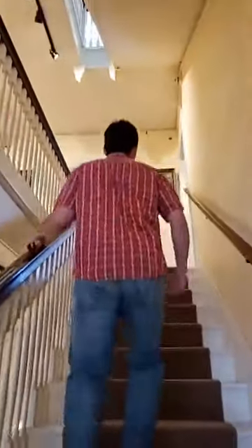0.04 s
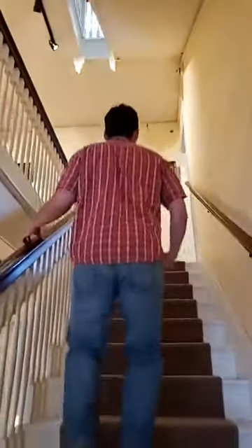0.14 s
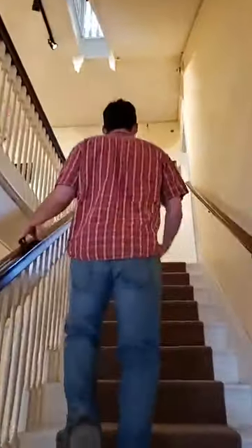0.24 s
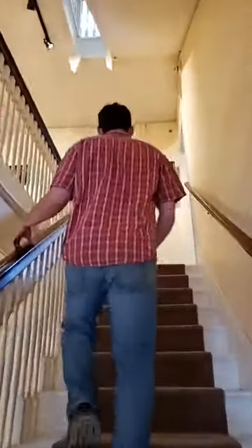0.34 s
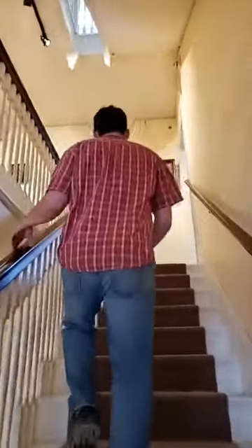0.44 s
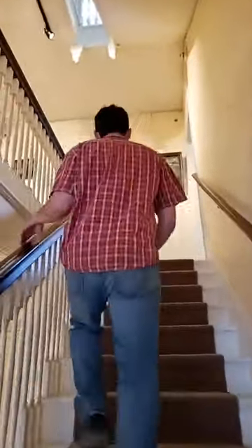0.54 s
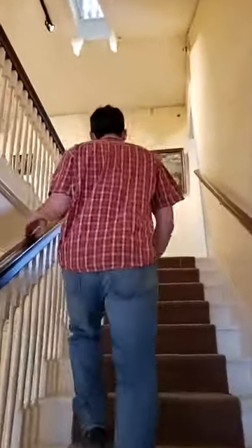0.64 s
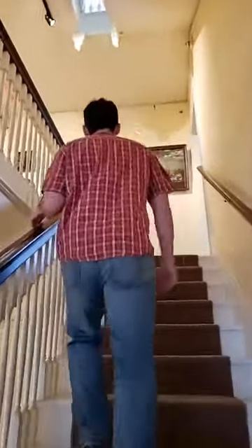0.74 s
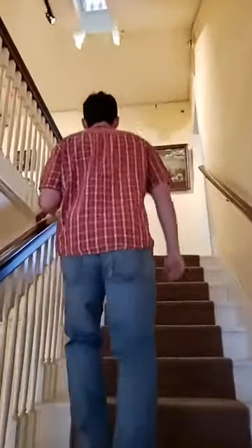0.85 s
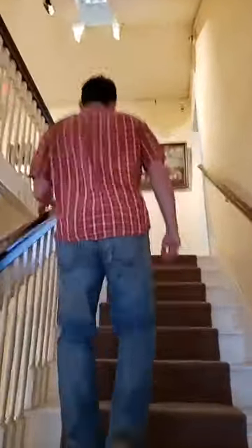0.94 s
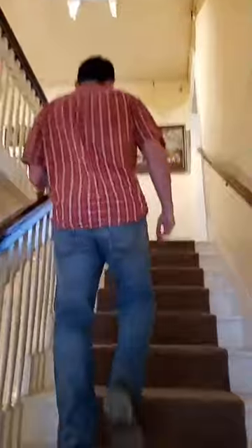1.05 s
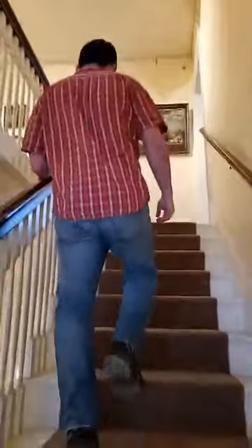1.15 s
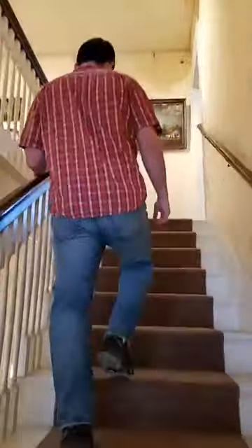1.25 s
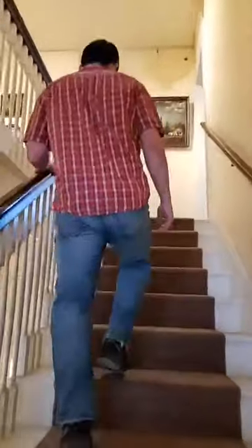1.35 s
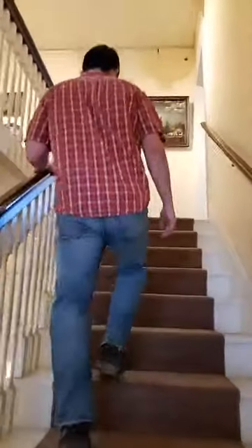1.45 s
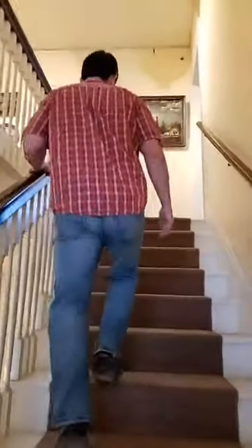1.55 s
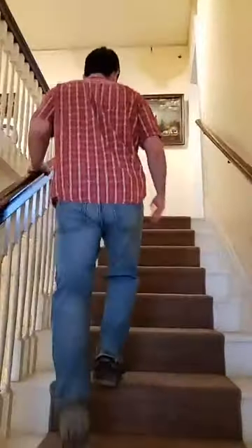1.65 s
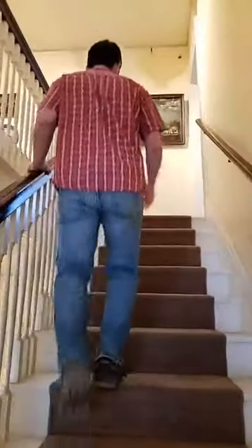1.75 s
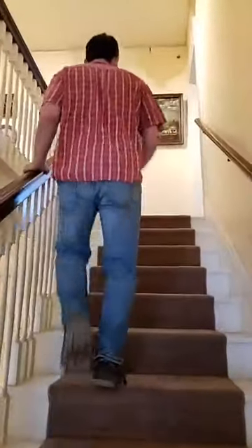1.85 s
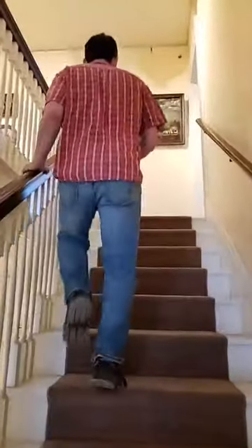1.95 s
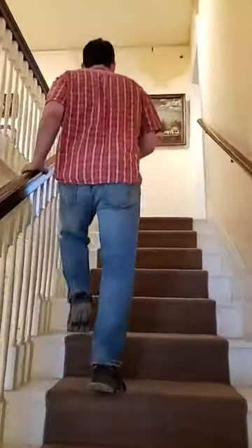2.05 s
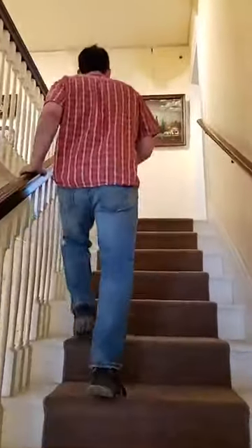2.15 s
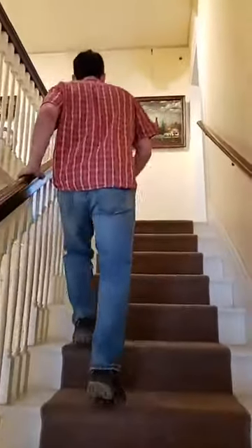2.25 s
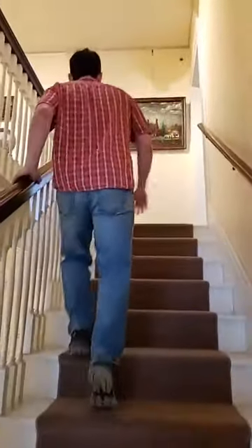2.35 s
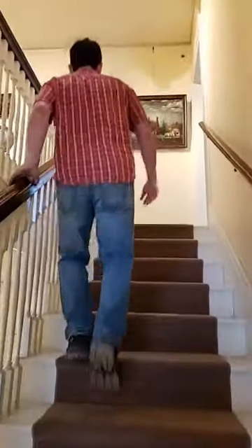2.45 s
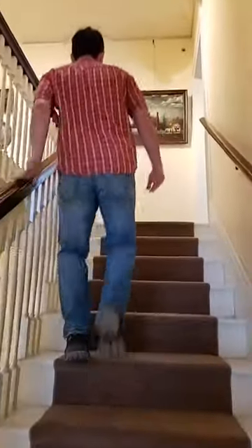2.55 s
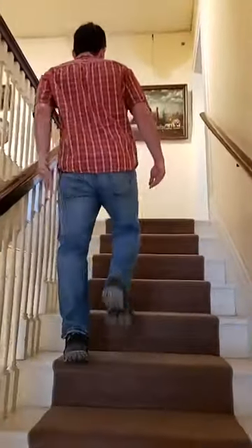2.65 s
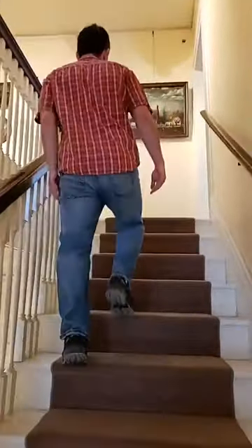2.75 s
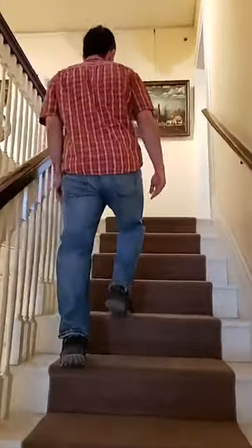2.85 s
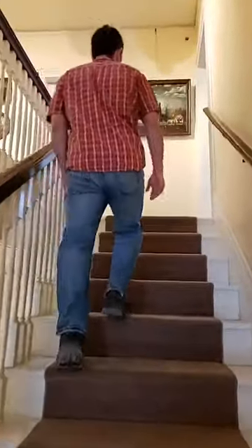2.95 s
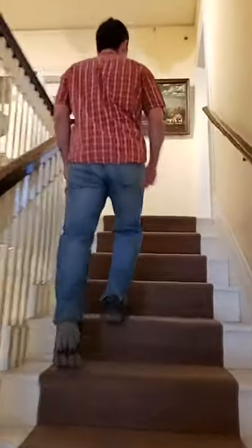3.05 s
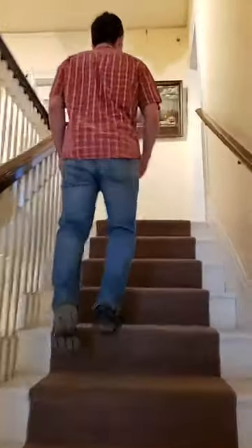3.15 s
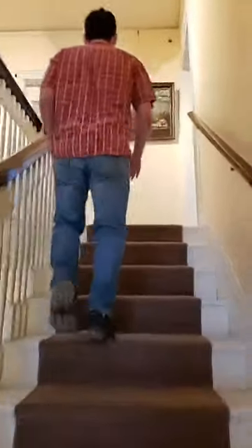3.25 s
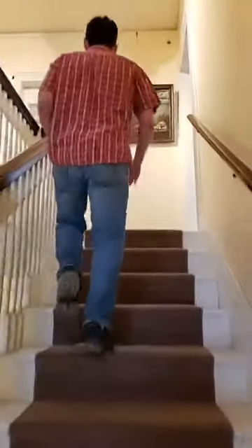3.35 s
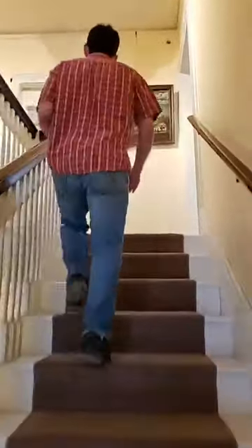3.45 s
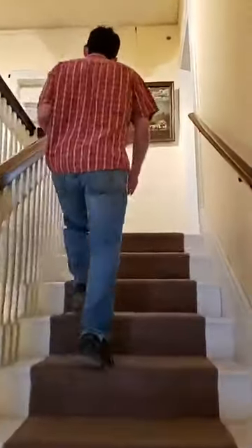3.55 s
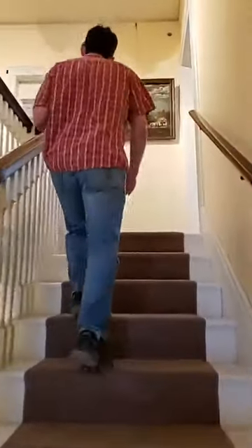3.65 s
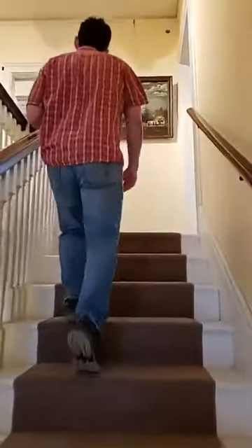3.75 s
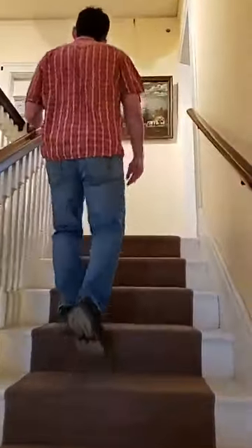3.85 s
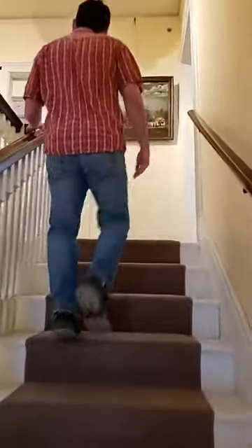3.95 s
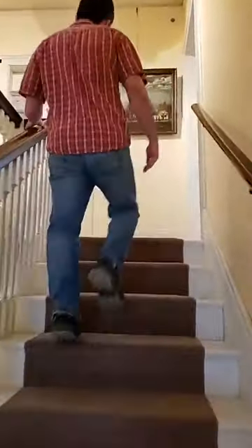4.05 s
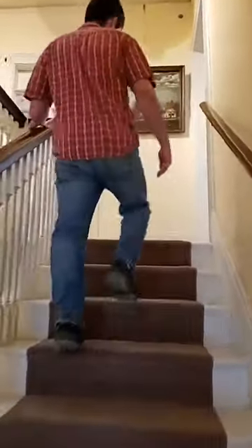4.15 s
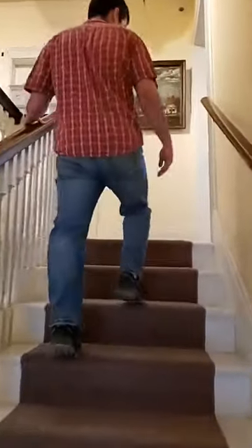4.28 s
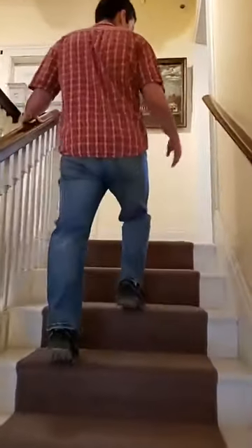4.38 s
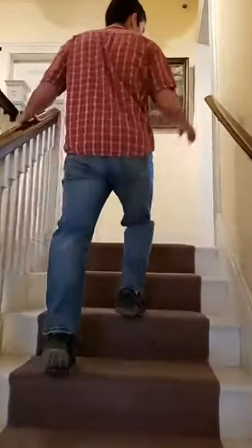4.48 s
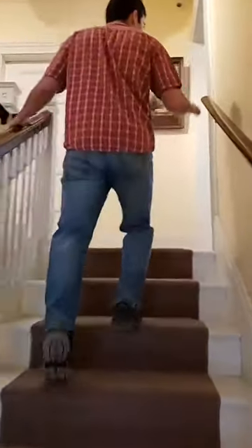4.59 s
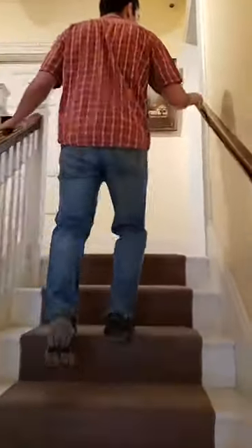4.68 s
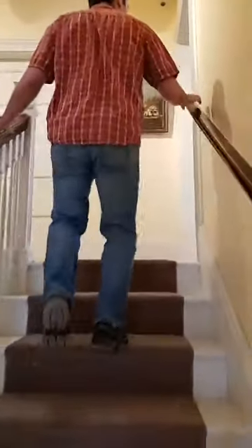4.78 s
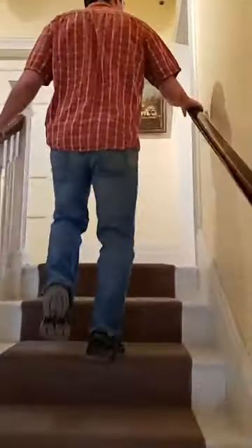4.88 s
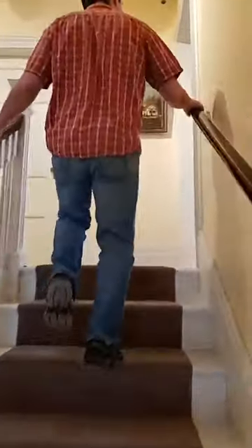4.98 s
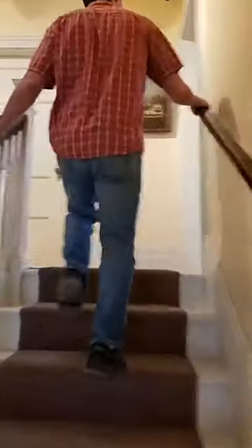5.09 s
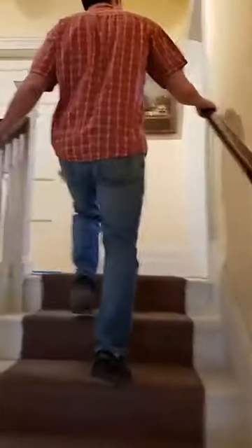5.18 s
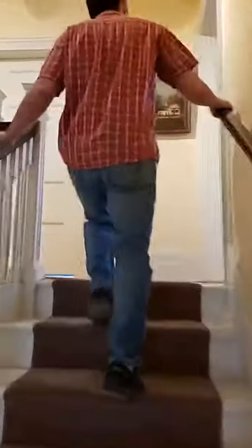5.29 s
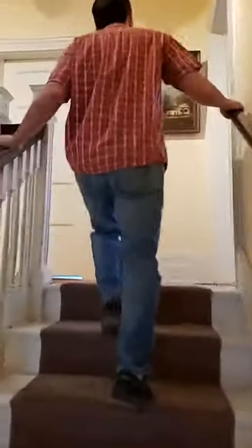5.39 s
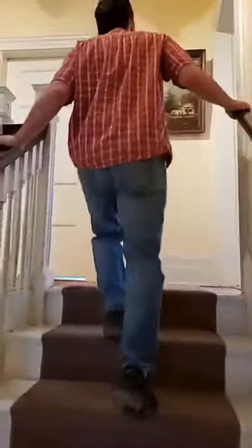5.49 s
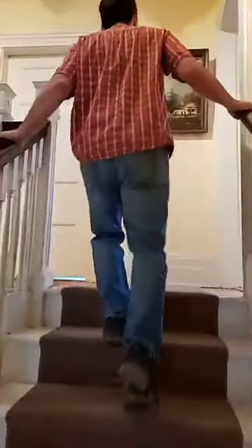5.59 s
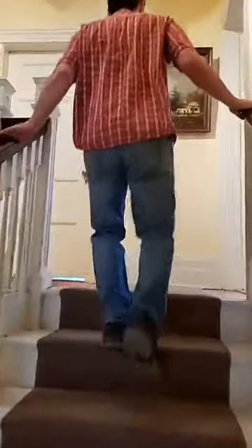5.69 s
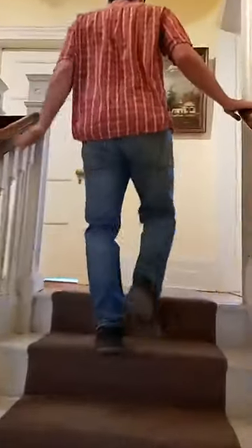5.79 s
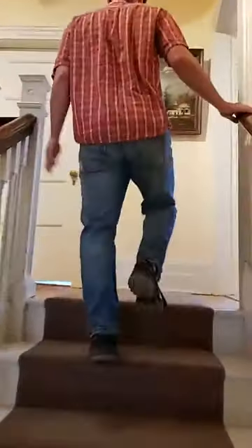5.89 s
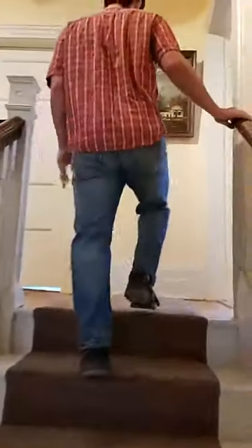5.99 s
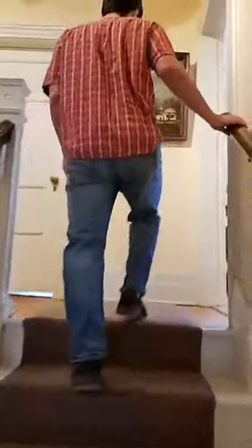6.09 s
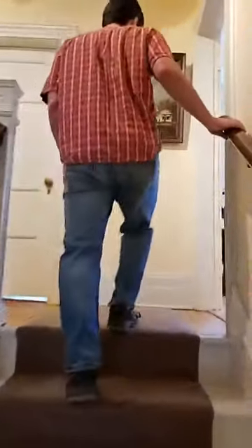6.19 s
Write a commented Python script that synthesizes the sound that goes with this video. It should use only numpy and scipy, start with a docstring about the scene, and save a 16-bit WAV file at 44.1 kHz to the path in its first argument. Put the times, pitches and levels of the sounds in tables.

```python
"""A tall, bare stairwell, heard on one microphone as someone climbs its old carpeted wooden stairs.
Under the weight the joints let go with a crack, or stick and slip in a creak, then tick as they ease.
Each footfall is a soft low thud, close enough to hear the brush of trouser cloth and sole.
The stairwell rings on, and the rooms farther off send back a long echo, over a faint room hiss."""
import sys
import numpy as np
from scipy import signal
from scipy.fft import rfft, irfft
from scipy.io import wavfile

SR = 44100
rng = np.random.default_rng(int(sys.argv[2]) if len(sys.argv) > 2 else 0)


def generate_wav(sig):
    """Save sig (samples, or channels by samples) to the path in sys.argv[1] as 16-bit PCM at SR."""
    pcm = np.round(np.clip(np.atleast_2d(sig).T, -1, 1) * 32767).astype(np.int16)
    wavfile.write(sys.argv[1], SR, pcm)


N = 274566

# Creaks as weight comes onto a tread and leaves it. Each row: start, full load and end in seconds,
# level in dB, depth in dB, slips per second at full load. A row that ends before it starts has no slips.
CREAKS = [(0.686, 0.71, 0.79, -29.5, -6, 135), (0.778, 0.841, 0.882, -20.5, -7, 370),
          (1.626, 1.703, 1.725, -20, -6, 366), (2.116, 2.286, 2.22, -38, -5, 39),
          (2.339, 2.36, 2.498, -23.5, -4, 320), (3.006, 3.036, 3.05, -30, 2.5, 237),
          (3.261, 3.295, 3.413, -31.5, 3, 250), (3.723, 3.784, 3.81, -43.5, 14, 224),
          (3.924, 3.931, 4.045, -35.5, 3, 240), (4.605, 4.609, 4.72, -42, 6, 210),
          (5.143, 5.236, 5.3, -38, 2, 210), (6.085, 6.11, 5.67, -36, 14, 220)]
# Footfalls on the carpet. Each row: start in seconds, sag level in dB, pitch of the flexing stair in Hz,
# sole puff in dB. The full weight sounds low, a toe tap high.
FOOTFALLS = [(0.247, -32.5, 65.8, -40.5), (0.699, -46, 72, -44), (0.922, -36, 51.7, -56),
             (1.635, -23, 47, -25), (2.286, -36, 47.7, -43), (2.385, -40, 54.7, -40.5),
             (3.012, -29, 44.6, -30.5), (3.482, -38, 74.5, -37), (3.830, -29, 78, -29),
             (3.853, -19, 41.4, -45), (4.136, -37, 64, -37.5), (4.41, -49, 67, -46.5),
             (4.484, -25, 49.4, -34.5), (5.103, -23, 49, -36.5), (5.531, -50, 60.6, -38),
             (5.869, -38.5, 61, -45)]
# Make-up of a lone slip: offsets in dB for snap, knock, ping and tick.
LONE_SLIP_DB = [0.5, -14.5, -11, -15]
RING_TIME = np.arange(SR // 6) / SR   # seconds after a slip


def cracks():
    """A loaded joint lets go all at once."""
    # Each row: start in seconds, level in dB, depth in dB, pitch of the joint in Hz.
    releases = [(0.0509, -31.5, 2, 1070), (0.1068, -32.5, -0.5, 1170), (0.6922, -28.5, -5, 870),
                (0.7195, -25, -3, 1040), (0.834, -12.5, -2, 1190), (0.875, -22.5, -5, 926),
                (0.9519, -26.5, 0, 1050), (0.9925, -27.5, 1.5, 960), (1.257, -18, -3, 945),
                (1.2773, -24, 0.5, 990), (1.5858, -17, -6, 960), (1.601, -24, 5.5, 940),
                (1.7464, -20, 0, 863), (1.7603, -22, -10, 1000), (1.8441, -19.5, -1.5, 945),
                (1.939, -22, 0.5, 940), (2.3139, -30, -1, 1360), (2.322, -25.5, 1, 1054),
                (2.3361, -21, -6.5, 862), (2.3526, -15.5, -4.5, 810), (2.471, -28, 8, 1390),
                (3.0368, -27.5, 8, 1090), (3.046, -20.5, 4.5, 760), (3.0833, -21.5, -3, 910),
                (3.1015, -26, 6, 1075), (3.1958, -47, 26, 830), (3.2604, -27.5, 8.5, 1080),
                (3.7141, -25, -3, 1040), (3.736, -25, 11.5, 1430), (3.7636, -18.5, -9, 820),
                (3.8709, -25.5, -26, 1390), (3.92, -25.5, 10, 1054), (3.9458, -28.5, 6, 735),
                (3.9831, -26.5, 11.5, 950), (4.5065, -27.5, 2, 940), (4.5627, -31.5, 11.5, 750),
                (4.6017, -28, 7, 1380), (4.617, -29.5, 15, 850), (5.1362, -16.5, 1, 980),
                (5.2176, -29.5, 10.5, 610), (5.449, -32.5, 4.5, 719), (5.569, -32.5, -11, 915),
                (5.6015, -21.5, 0, 966), (5.6589, -21.5, 5, 820), (5.835, -33.5, -8, 1230),
                (6.0765, -29.5, 11, 670), (6.102, -26, 8, 685)]
    out = np.zeros(N)
    for start, db, depth_db, hz in releases:
        response = board(hz, tear_s=0.0022, joint_t60=0.015, main_db=2.5)
        add(out, start, slip_gains(LONE_SLIP_DB, db, depth_db) @ response)
    return out


def creaks():
    """Every tread creaks with a voice of its own."""
    out = np.zeros(N)
    for row in CREAKS:
        add(out, row[0], creak(row, jitter=.2, uneven_db=2.5, joint_hz=959))
    return out


def creak(row, jitter, uneven_db, joint_hz, spots=5):
    """A joint sticks and slips at several spots along its length, faster and harder as the load grows."""
    # Make-up of a slip within a creak: offsets in dB for snap, knock, ping and tick.
    makeup_db = [0.5, -15, -13, -15.5]
    slack_db, slack_rate = -8.5, 0.5   # with no load the slips are weaker and half as fast
    start, full, end, db, depth_db, rate = row
    slips = np.zeros((spots, 4, SR // 4))
    now = start
    for k, (late, strong) in enumerate(rng.standard_normal((120, 2))):
        at = int((now - start) * SR)
        if now > end or at >= slips.shape[-1]:
            break
        slack = np.interp(now, [start, full, end], [0.65, 0, 1])   # share of the load that is off
        slip_db = db + slack_db * slack + uneven_db * strong
        slips[k % spots, :, at] = slip_gains(makeup_db, slip_db, depth_db)
        now += np.exp(jitter * late) / (rate * slack_rate ** slack)
    pitches = joint_hz * np.geomspace(.8, 1.3, spots)
    return sum(signal.fftconvolve(spot, board(hz, tear_s=0.0021), axes=1).sum(axis=0)
               for spot, hz in zip(slips, pitches))


def board(joint_hz, tear_s, joint_t60=0.02, main_db=-1):
    """One spot of the stair answers one slip: rows snap, knock, ping, tick."""
    # Modes of a tread and of its joints. Each row: pitch in Hz, level in dB, t60 in seconds.
    tread_modes = [(157.2, -7.5, 0.083), (202, -6.5, 0.061), (241, -8.5, 0.11), (311, -1.5, 0.066),
                   (360, 0, 0.053), (411, -5.5, 0.097), (479, -1, 0.057), (541, -3, 0.04), (626, -5, 0.051)]
    joint_modes = [(692, -7.5, 0.02), (841, 1.5, 0.021), (926, 0, 0.018), (1083, -0.5, 0.021),
                   (1247, 1.5, 0.015), (1505, -2.5, 0.018), (1727, -2, 0.013), (2100, -20, 0.0034),
                   (2690, -13, 0.0048)]
    # Colours of the snap and of the higher tick. Each row: frequency in Hz, level in dB.
    snap_colour = [(900, -7), (1600, -1.5), (2300, -4.5), (2900, -2), (3900, -2), (4800, -4), (5500, -7),
                   (6400, -5.5), (7000, -6), (7900, -3.5), (8600, -32), (10500, -12), (12000, -12.5)]
    tick_colour = [(8500, -11.5), (10500, -16), (11500, -5.5), (13000, -1), (14000, -8), (16000, -5.5)]
    # Base energy in dB of snap, knock, ping and tick.
    energy_db = [10.05, 24.28, 21.66, 22.7]
    snap = burst(snap_colour, tear_s)
    knock = unit(ring(tread_modes, RING_TIME, spread_db=2.5))
    main_mode = unit(np.sin(2 * np.pi * joint_hz * RING_TIME) * fade(RING_TIME, joint_t60))
    side_modes = unit(ring(joint_modes, RING_TIME, spread_db=2.5))
    build = 1 - fade(RING_TIME, 0.022)   # bending waves take a moment to fill the board
    ping = unit((from_db(main_db) * main_mode + side_modes) * build)
    tick = burst(tick_colour, 0.69 * tear_s)   # the highest modes die first
    return from_db(energy_db)[:, None] * np.array([snap, knock, ping, tick])


def slip_gains(makeup_db, level_db, depth_db):
    """Gains of the four parts of a slip; depth is how much more the whole tread knocks along."""
    # Change in dB per dB of depth for snap, knock, ping and tick.
    per_depth = [0, 0.94, 0.4, 0.0]
    return from_db(level_db + np.array(makeup_db) + depth_db * np.array(per_depth))


def ring(modes, t, spread_db):
    """Struck modes; their strengths and signs depend on the spot that is struck."""
    hz, db, t60 = np.transpose(modes)[:, :, None]
    strength = from_db(db + spread_db * rng.standard_normal(hz.shape)) * rng.choice([-1, 1], hz.shape)
    detune = 1 + 0.027 * rng.standard_normal(hz.shape)   # no two boards are quite alike
    return np.sum(strength * np.sin(2 * np.pi * hz * detune * t) * fade(t, t60), axis=0)


def burst(colour, decay_s):
    """Dense high modes, dead within a few milliseconds of the slip."""
    envelope = np.exp(-RING_TIME / decay_s) * (1 - fade(RING_TIME, 0.014))
    return unit(noise(colour, len(RING_TIME)) * envelope)


def thuds(swell_cycles, sag_t60, puff_t60):
    """The carpet softens each footfall: the stair sags and swings back, the flight hums on."""
    # Modes of the whole flight. Each row: pitch in Hz, level against the sag in dB, t60 in seconds.
    flight_modes = [(51.1, -8.5, 0.63), (35.4, -11, 0.12), (71.15, -8, 0.48)]
    # Puff of a sole on carpet. Each row: frequency in Hz, level in dB.
    puff_colour = [(25, -14.5), (70, -2), (115, -3.5), (170, -11), (300, -36), (800, -28), (3000, -51)]
    out, t = np.zeros(N), np.arange(SR) / SR
    hum = sum(from_db(db) * np.sin(2 * np.pi * hz * t) * fade(t, t60) for hz, db, t60 in flight_modes)
    for start, db, hz, puff_db in FOOTFALLS:
        press = 1 - np.exp(-(t * hz / swell_cycles) ** 2)   # slow weight goes with a deeper thud
        sag = np.sin(2 * np.pi * hz * t) * fade(t, sag_t60)
        puff = noise(puff_colour, len(t)) * fade(t, puff_t60)
        add(out, start, press * (from_db(db) * (sag + hum) + from_db(puff_db) * puff))
    return out


def settling(level_db, spread_db, within_s, count=2):
    """After each creak the boards ease back with faint ticks at random moments."""
    out = np.zeros(N)
    for _, _, end, *_ in CREAKS:
        for wait, strong in zip(rng.random(count), rng.standard_normal(count)):
            gains = slip_gains(LONE_SLIP_DB, level_db + spread_db * strong, depth_db=0)
            add(out, end + within_s * wait, gains @ board(joint_hz=950, tear_s=0.0017))
    return out


def hollow_flight(x):
    """The boxed-in stair lends all its noises a few common resonances."""
    # Each row: centre in Hz, width in Hz, level in dB.
    resonances = [(170, 16, -2), (300, 29, -5.5), (2090, 710, -10.5)]
    return x + sum(from_db(db) * signal.lfilter(*signal.iirpeak(hz, hz / width, fs=SR), x)
                   for hz, width, db in resonances)


def brushes(base_db, grain_db, lead_s, width_s):
    """Trouser cloth and sole brush as each foot comes down, grainy as the weave catches."""
    # Each row: frequency in Hz, level in dB.
    cloth_colour = [(120, -16), (350, 11.5), (800, -6.5), (1400, 0), (2500, -13), (5000, -13), (7900, -17),
                    (9000, -36), (13500, -21)]
    t, swell = np.arange(N) / SR, np.zeros(N)
    for start, sag_db, *_ in FOOTFALLS:
        gain = from_db(base_db + 0.39 * sag_db)   # a little louder on a heavy step
        swell += gain * np.exp(-(2 * (t - start + lead_s) / width_s) ** 2)
    catches = np.arange(0, N, 200)
    grain = np.interp(np.arange(N), catches, rng.standard_normal(len(catches)))
    return swell * from_db(grain_db * grain) * noise(cloth_colour, N)


def stairwell(x, build_s, early_db, early_t60, positions=7):
    """Quick scatter off balusters and walls, then a tail that dies sooner in the treble."""
    # Decay of the stairwell. Each row: frequency in Hz, t60 in seconds.
    hall_t60 = [(100, 1.2), (400, 0.56), (1500, 0.62), (4000, 0.47), (8000, 0.49), (14000, 0.3)]
    # Echo at the microphone. Each row: frequency in Hz, level in dB.
    hall_db = [(60, -4), (200, -1.5), (400, 4.5), (1000, 0), (4000, -0.5), (8000, -4), (14000, -4)]
    t, echoes = np.arange(SR) / SR, 0
    edges_hz = np.geomspace(45, 16000, 13)
    white = rng.standard_normal((2, positions, len(t)))
    early = from_db(early_db) * fade(t, early_t60)
    far = from_db(-23.5) * fade(t, t60=1.77)   # faint, long echo from the rooms beyond
    build = 1 - np.exp(-t / build_s)
    for k, (low, high) in enumerate(zip(edges_hz, edges_hz[1:])):
        hz = np.sqrt(low * high)
        band = signal.sosfilt(signal.butter(2, [low, high], "band", fs=SR, output="sos"), white[k % 2])
        tails = unit(band * (early + fade(t, at_hz(hall_t60, hz)) + far) * build)
        echoes = echoes + tails * from_db(at_hz(hall_db, hz)) * np.sqrt(2 * positions * (high - low) / SR)
    out, place = np.zeros(N), np.linspace(0, positions - 1, N)
    for k, echo in enumerate(echoes):   # the echo pattern changes as the walker climbs
        near = np.flatnonzero(np.abs(place - k) < 1)
        crossfade = np.cos(np.pi / 2 * (place[near] - k))
        add(out, near[0] / SR, signal.fftconvolve(x[near] * crossfade, echo))
    return out


def room_hiss(base_db):
    """The still air of the house: a faint hiss that sinks in a few of the pauses."""
    # Each row: frequency in Hz, level in dB.
    air_colour = [(10, -10), (22, 3), (35, -1.5), (65, -1.5), (100, -0.5), (200, -6), (400, -12),
                  (1000, -18.5), (2000, -25.5), (4000, -29), (7900, -29), (8700, -40.5), (10200, -39.5),
                  (11500, -29), (14000, -26.5)]
    # Each row: time in seconds, level offset in dB.
    drift = [(0.33, 2.5), (0.64, -3.5), (1.05, 4.5), (1.53, -2), (2.2, -0.5), (3.35, 3), (3.63, -0.5),
             (4.1, 0), (6.2, 2.5)]
    drift_db = np.interp(np.arange(N) / SR, *np.transpose(drift))
    return from_db(base_db + drift_db) * noise(air_colour, N)


def from_db(db):
    """Decibels to gain."""
    return 10 ** (np.asarray(db) / 20)


def unit(x):
    """Scale to an energy of one."""
    return x / np.sqrt(np.sum(x ** 2) + 1e-20)


def at_hz(points, hz):
    """Read a table along a log-frequency axis."""
    frequency, value = np.transpose(points)
    return np.interp(np.log(hz + 1e-9), np.log(frequency), value)


def noise(colour, size):
    """Coloured noise of rms one."""
    gain = from_db(at_hz(colour, np.arange(size // 2 + 1) * SR / size))
    return unit(irfft(rfft(rng.standard_normal(size)) * gain, size)) * np.sqrt(size)


def fade(t, t60):
    """Exponential decay, 60 dB down after t60 seconds."""
    return np.exp(-np.log(1000) * t / t60)


def add(track, start_s, sound):
    """Mix a sound in at a time."""
    at = int(np.clip(round(start_s * SR), 0, N - 1))
    track[at:at + len(sound)] += sound[:N - at]


def scene():
    """At the microphone, in mono: woodwork, steps and clothes up front, echo and hiss behind."""
    woodwork = cracks() + creaks() + settling(level_db=-47, spread_db=1.5, within_s=0.15)
    stairs = hollow_flight(woodwork + thuds(swell_cycles=0.52, sag_t60=0.3, puff_t60=0.3))
    echoes = stairwell(stairs, build_s=0.00084, early_db=1.5, early_t60=0.18)
    air = room_hiss(base_db=-52)
    cloth = brushes(base_db=-44.5, grain_db=7.5, lead_s=0.002, width_s=0.079)
    return (stairs + echoes + cloth + air)[None]


def record(dry):
    """The top of the treble is cut steeply."""
    cutoff_hz = 14120
    return signal.sosfilt(signal.ellip(10, .3, 70, cutoff_hz, fs=SR, output="sos"), dry)


dry = scene()
out = record(dry)
generate_wav(out)
```